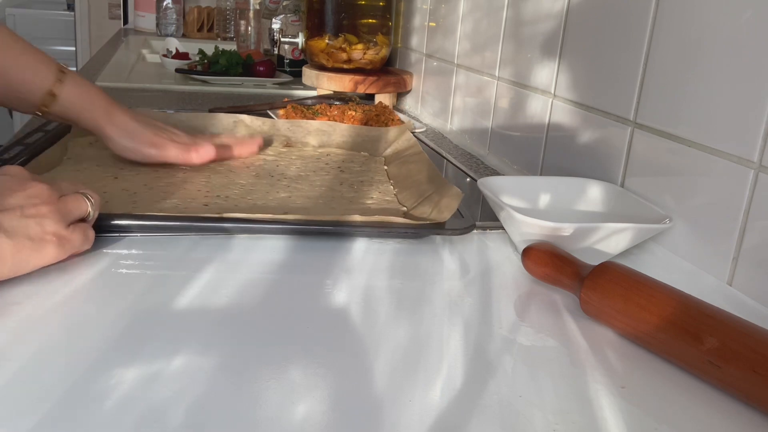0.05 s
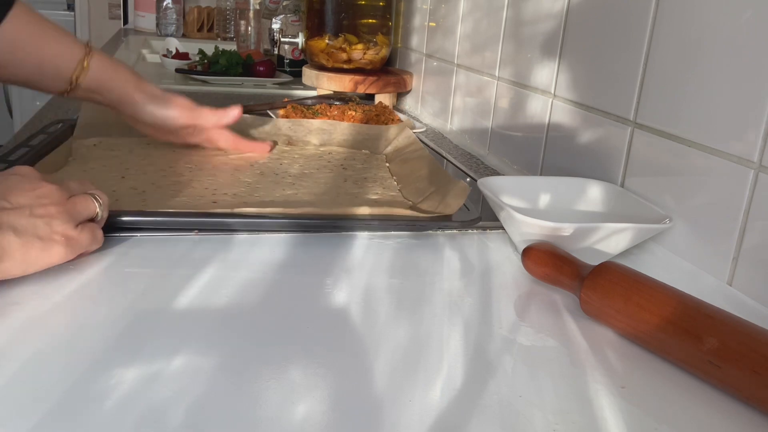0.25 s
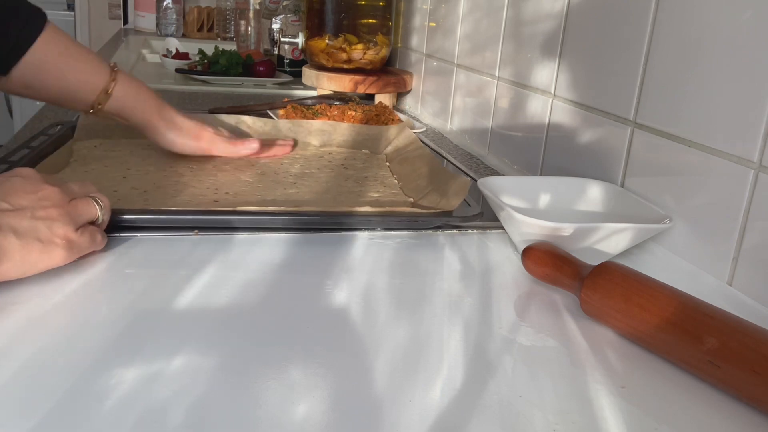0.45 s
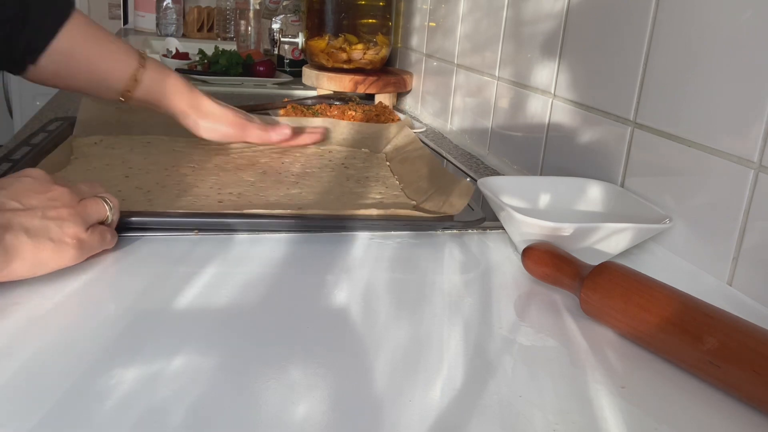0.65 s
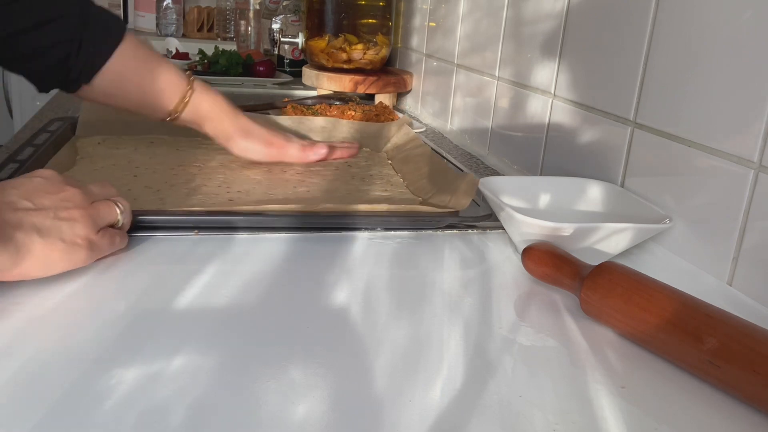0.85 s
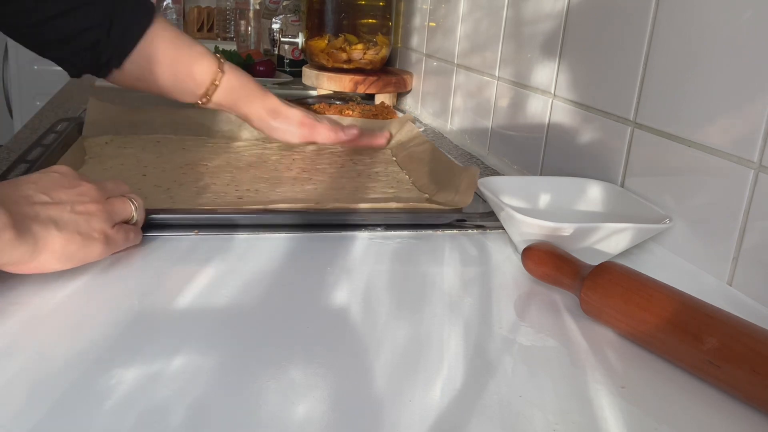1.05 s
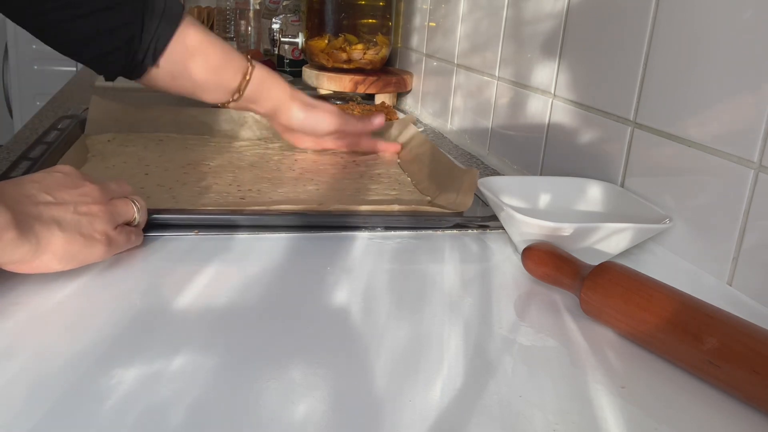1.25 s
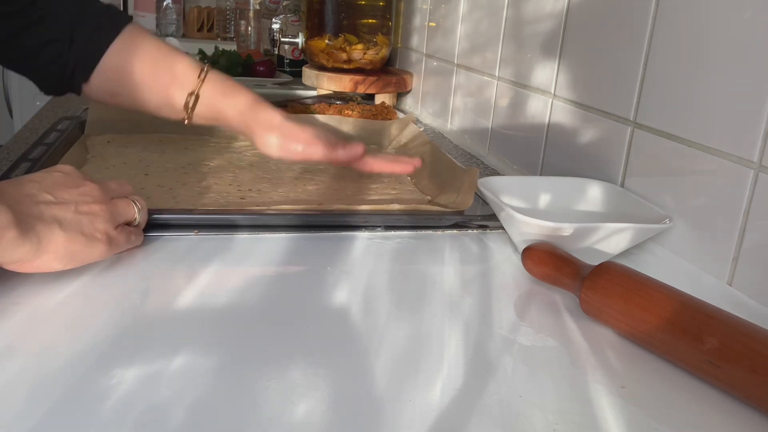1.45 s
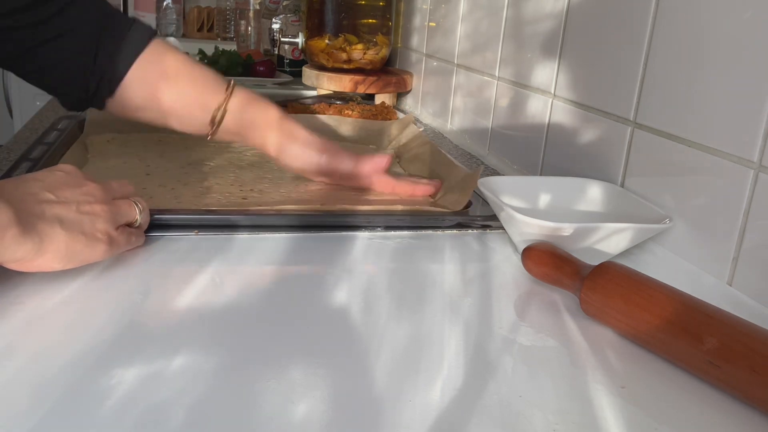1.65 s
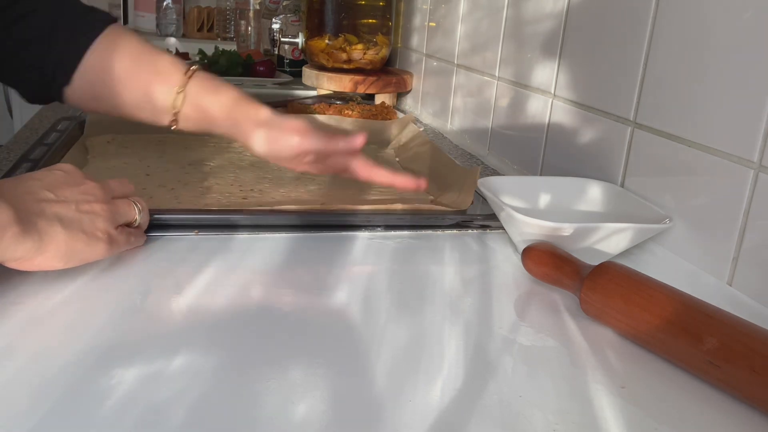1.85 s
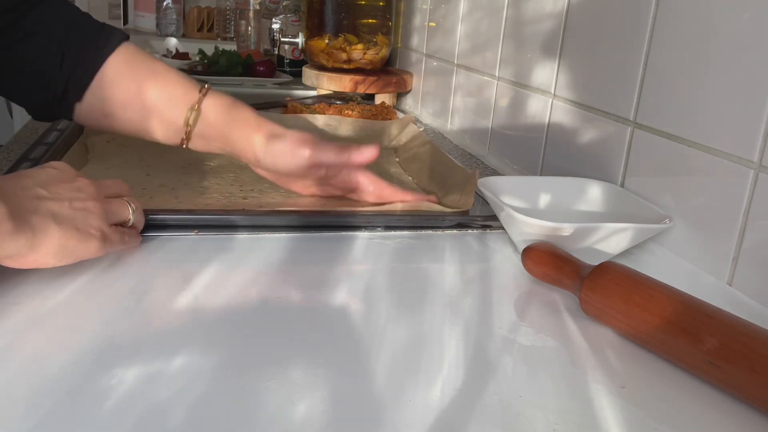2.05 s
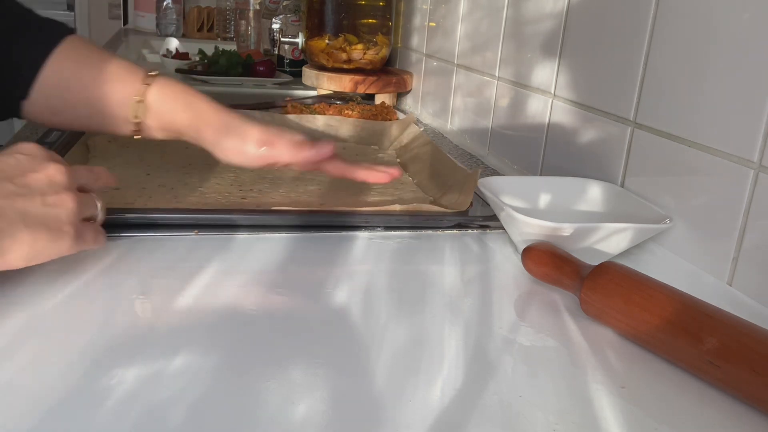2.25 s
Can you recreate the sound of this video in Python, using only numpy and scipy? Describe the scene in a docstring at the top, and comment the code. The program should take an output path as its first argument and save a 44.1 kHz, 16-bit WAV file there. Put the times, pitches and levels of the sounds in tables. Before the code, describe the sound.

Irregular soft slaps on a paper-lined baking tray, each with a short dull metallic boom and low counter thump; paper rustles between them, faint room air, close stereo pickup, short kitchen echo.

```python
"""A hand pats a thin sheet of dough lying on baking paper in a metal tray, on a counter in a tiled kitchen.
Each pat is a band of noise for the slap, ringing modes for the boom of the tray and the thump of the counter.
The paper crackles in bursts of tiny noise snaps; between pats the rocking tray and counter hum faintly.
Feedback delays give the kitchen's echo, over a steady bed of coloured noise for the air."""
import sys
import numpy as np
from scipy import signal
from scipy.fft import rfft, irfft, next_fast_len
from scipy.io import wavfile

SR = 44100
rng = np.random.default_rng(int(sys.argv[2]) if len(sys.argv) > 2 else 0)


def persist_wave(psi):
    """Save psi, clipped to +-1, as 16-bit WAV."""
    counts = np.round(np.clip(psi, -1, 1) * 32767).astype(np.int16)
    wavfile.write(sys.argv[1], SR, np.atleast_2d(counts).T)


def convert_level_to_amplitude(level_db):
    """Map a level in decibels to its linear amplitude factor."""
    exponent = np.asarray(level_db, float) / 20
    return 10 ** exponent


N = 101429   # length in samples


def rms_one(x):
    """Scale to rms 1."""
    return x / np.sqrt(np.mean(x ** 2) + 1e-20)


def in_time(rows):
    """Join (seconds, value) rows by straight lines."""
    return np.interp(np.arange(N) / SR, *np.transpose(rows))


def colour(x, spectrum):
    """Shape by a (Hz, dB) table with a minimum-phase filter of unit energy, so nothing sounds early."""
    size = next_fast_len(N + SR // 2)
    hz, db = np.transpose(spectrum)
    grid_hz = np.arange(1025) * SR / 2048
    curve_db = np.interp(np.log(grid_hz + 1), np.log(hz), db)
    # folding the cepstrum forward in time makes the filter minimum phase
    cepstrum = irfft(np.log(convert_level_to_amplitude(curve_db)))
    cepstrum[1:1024] *= 2
    cepstrum[1025:] = 0
    pulse = irfft(np.exp(rfft(cepstrum)))
    pulse /= np.sqrt(np.sum(pulse ** 2))
    return irfft(rfft(x, size) * rfft(pulse, size), size)[..., :N]


def soften(x, cut_hz):
    """Two-pole low-pass."""
    return signal.sosfilt(signal.butter(2, cut_hz, fs=SR, output="sos"), x)


def ring(push, hz, t60):
    """A resonator: a unit click sets a sine of height 1 ringing, down 60 dB after t60 seconds."""
    radius = convert_level_to_amplitude(-60 / (t60 * SR))
    angle = 2 * np.pi * hz / SR
    return signal.lfilter([0, np.sin(angle)], [1, -2 * radius * np.cos(angle), radius ** 2], push + 1e-18)


def swell(rise, fall, late=0):
    """Envelope: rounded rise, then exponential fall, all in seconds."""
    t = np.arange(SR // 5) / SR - late
    return np.clip(t / rise, 0, 1) ** 2 * np.exp(-np.clip(t - rise, 0, 1) / fall)


def lay(start, rows):
    """Place the rows at their start times."""
    out = np.zeros(N + SR)
    for s, row in zip(start, rows):
        i = max(int(s * SR), 0)
        out[i:i + len(row)] += row
    return out[:N]


# Spectrum of the room air. Each row: frequency in Hz, relative level in dB per Hz.
AIR_SPECTRUM = [(30, -16), (130, -6.5), (470, -30), (4000, -31), (16000, -48)]
AIR_DB = -58


def room_air():
    """Steady noise, drawn separately for each side."""
    return convert_level_to_amplitude(AIR_DB) * colour(rng.standard_normal((2, N)), AIR_SPECTRUM)


# Low modes of the tray. Each row: frequency in Hz, relative level in dB, t60 in seconds.
TRAY_MODES = [(222, -2, 0.05), (263, 5, 0.085), (297, 1, 0.06), (335, 2, 0.085), (501, -6, 0.07)]
# Modes of the counter. Each row: frequency in Hz, relative level in dB, t60 in seconds.
COUNTER_MODES = [(47.3, -36, 0.07), (60.9, -11, 0.43), (113.7, -5, 0.11), (138, 0.5, 0.12)]
# How hard the tray rocks under the hand. Each row: time in seconds, level in dB of the counter's hum.
ROCKING = [(0, -47), (1.2, -50), (1.4, -72), (1.6, -52.5), (2.3, -74)]
ROCK_TRAY_DB = -4   # tray against counter


def hum(push, modes):
    """Every mode rings on under the same continuous push."""
    return rms_one(sum(convert_level_to_amplitude(db) * ring(push, hz, t60) for hz, db, t60 in modes))


def rocking():
    """Small uneven pushes keep counter and tray humming."""
    push = rng.standard_normal(N)
    both = hum(push, COUNTER_MODES) + convert_level_to_amplitude(ROCK_TRAY_DB) * hum(push, TRAY_MODES)
    return convert_level_to_amplitude(in_time(ROCKING)) * both


# Paper crackles. Each row: start in seconds, level in dB before PAPER_DB, length in seconds.
CRACKLES = [(.004, -29, 0.039), (0.034, -34, 0.1), (0.184, -17, 0.02), (0.275, -24, 0.011),
            (0.302, -23, 0.013), (0.336, -26, 0.021), (0.359, -26.5, 0.015), (0.376, -22, .012),
            (0.424, -25, 0.0081), (0.452, -27.5, 0.028), (0.493, -18.5, 0.011), (0.57, -25, 0.0022),
            (0.64, -28.5, 0.049), (0.715, -18, 0.006), (0.726, -14.5, 0.0052), (0.804, -32, 0.027),
            (0.859, -32, 0.023), (0.88, -21.5, 0.022), (0.914, -24.5, 0.018), (0.98, -22.5, 0.027),
            (1.051, -20.5, 0.0097), (1.073, -19.5, 0.01), (1.098, -19.5, 0.011), (1.151, -17, 0.012),
            (1.157, -22, 0.07), (1.233, -25.5, 0.0039), (1.247, -19, 0.011), (1.257, -30, 0.0028),
            (1.422, -41.5, 0.022), (1.436, -23.5, 0.041), (1.502, -21.5, 0.0071), (1.515, -20.5, 0.027),
            (1.541, -24, 0.014), (1.568, -30.5, 0.023), (1.6, -22, 0.019), (1.61, -21, 0.0067),
            (1.661, -22, 0.011), (1.801, -27, 0.019), (1.827, -31, 0.036), (1.93, -20, 0.018),
            (2.007, -27, 0.016), (2.029, -18, 0.0096), (2.28, -43, 0.018)]
# Spectrum of the paper. Each row: frequency in Hz, relative level in dB per Hz.
PAPER_SPECTRUM = [(400, -16), (1000, -3.5), (2500, -4.5), (4000, 0.5), (8000, 2), (16000, -1.5)]
PAPER_DB = -9
SNAPS_PER_S, SNAP_SPREAD_DB = 9000, 3.0
CLUMP_DB, CLUMP_HZ = 4, 87   # the snaps come in clumps
RISE_S, RISE_SHARE, FALL_SHARE = 0.006, 0.3, 0.8   # shares of the crackle's length
FAR_EDGE_HZ = 5740   # duller crackle from the other side of the sheet


def paper():
    """Dense tiny snaps of uneven size, in bursts, from two parts of the sheet."""
    s, db, length = np.transpose(CRACKLES)
    length = np.abs(length)[:, None]
    sizes = convert_level_to_amplitude(SNAP_SPREAD_DB * np.minimum(rng.exponential(1, (2, N)), 4))
    sizes = sizes * rng.choice([-1, 1], (2, N))
    clumps = convert_level_to_amplitude(CLUMP_DB * rms_one(soften(rng.standard_normal((2, N)), CLUMP_HZ)))
    fires = rng.random((2, N)) < SNAPS_PER_S / SR
    snaps = rms_one(clumps * sizes * fires)
    bursts = swell(RISE_S + RISE_SHARE * length, FALL_SHARE * length) * convert_level_to_amplitude(db + PAPER_DB)[:, None]
    # starting early puts the start time inside the rise
    loudness = lay(s - RISE_S / 2, bursts)
    near, far = colour(loudness * snaps, PAPER_SPECTRUM)
    return near, soften(soften(far, FAR_EDGE_HZ), FAR_EDGE_HZ)


MODE_SPREAD_DB, MODE_SHIFT = 4.0, .02   # limits either way; the hand's load shifts each mode by a share


def struck(start, force, peak_db, modes):
    """Each blow drives every mode, with a strength and slight shift of its own, scaled to the blow's peak."""
    chance = np.clip(rng.standard_normal((len(start), 2, len(modes))), -1, 1)
    force = np.pad(force, ((0, 0), (0, SR // 3)))   # room to ring on
    rows = []
    for push, (spread, shift) in zip(force, chance):
        row = 0
        for k, (hz, db, t60) in enumerate(modes):
            row = row + convert_level_to_amplitude(db + MODE_SPREAD_DB * spread[k]) * ring(push, hz * (1 + MODE_SHIFT * shift[k]), t60)
        rows.append(row)
    rows = np.array(rows)
    gain = convert_level_to_amplitude(peak_db) / np.abs(rows).max(axis=1)
    return lay(start, rows * gain[:, None])


# The pats. Each row: start in seconds, peak of the tray boom in dB, counter thump in dB relative to the boom
# before COUNTER_DB, slap in dB relative to the boom before SLAP_DB and RING_DB, pitch of the slap in Hz.
PATS = [(0.188, -26.5, 5.5, -2.5, 1640), (0.28, -33.5, 9, 0.5, 1780), (0.3261, -27, -3, -3.5, 1130),
        (0.3376, -24.5, -8, 1.5, 1480), (0.488, -28, 9, -3.5, 1390), (0.606, -44.5, 18, -3, 1500),
        (0.7266, -17.5, -1.5, 0, 2700), (0.817, -24, -27, -12, 900), (0.912, -36.5, -5, 1, 1430),
        (0.986, -30, -20, 10, 2200), (0.997, -8, -11, -10, 2200), (1.025, -14, -13, -4, 2690),
        (1.135, -28, -16, -15, 1500), (1.449, -12, -10, -3.5, 1700), (1.506, -26, -5.5, -30, 1410),
        (1.681, -37.5, -4, -7.5, 1160), (1.847, -14.5, -20.5, -7.5, 1920), (2.023, -32, -2.5, 3.5, 2520)]
# High modes of the tray, woken by the slap. Each row: frequency in Hz, relative level in dB, t60 in seconds.
TRAY_HIGH_MODES = [(795, -4, .05), (1308, 2, 0.055), (1443, 2, 0.045), (1804, 2, 0.045), (2057, 3, .08),
                   (2266, 4, 0.055), (2985, 2, .055)]
# Spectrum laid over the slap. Each row: frequency in Hz, relative level in dB per Hz.
SLAP_SPECTRUM = [(290, -16), (650, -4.5), (1500, -0.5), (4500, 0.5), (9000, -20), (16000, -30)]
PALM_HZ, FINGER_HZ, HEEL_HZ = 610, 5400, 114   # low-pass softness of each part of the hand
SLAP_DB, RING_DB, COUNTER_DB = 2.5, -1.5, -1.5
SLAP_WIDTH = 1.97   # the slap's band reaches this factor to either side of its pitch
SLAP_FALL_S = 0.0048
SLAP_TAIL_S, SLAP_TAIL_DB, SLAP_TAIL_HZ = 0.021, -15.5, 2200


def pats():
    """Fingers slap at a pitch set by the cupped hand; the palm then knocks the tray, the heel loads the counter."""
    s, db, low_db, slap_db, slap_hz = np.transpose(PATS)
    noise = rng.standard_normal((3, len(s), SR // 5))

    palm = soften(noise[0] * swell(rise=0.0027, fall=0.0056, late=.0022), PALM_HZ)
    boom = struck(s, palm, db, TRAY_MODES)

    heel = soften(noise[0] * swell(rise=0.011, fall=0.0092), HEEL_HZ)
    thump = struck(s, heel, db + low_db + COUNTER_DB, COUNTER_MODES)

    spikes = convert_level_to_amplitude(3.5 * rng.exponential(1, noise[1].shape).clip(0, 3))
    spiky = noise[1] * spikes * swell(rise=0.0011, fall=SLAP_FALL_S)
    cupped = []
    for hz, row in zip(slap_hz, spiky):
        band = signal.butter(1, [hz / SLAP_WIDTH, hz * SLAP_WIDTH], "band", fs=SR, output="sos")
        cupped.append(signal.sosfilt(band, row))
    cupped = np.array(cupped)
    cupped = cupped / np.abs(cupped).max(axis=1)[:, None]
    high = struck(s, cupped, db + slap_db + RING_DB, TRAY_HIGH_MODES)

    tail = rms_one(soften(noise[2], SLAP_TAIL_HZ)) * swell(rise=0.0057, fall=SLAP_TAIL_S)
    slaps = (cupped + convert_level_to_amplitude(SLAP_TAIL_DB) * tail) * convert_level_to_amplitude(db + slap_db + SLAP_DB)[:, None]
    slap = colour(lay(s, slaps), SLAP_SPECTRUM)
    return boom, thump, soften(high, FINGER_HZ) + slap


KITCHEN_T60_S, WALL_CUT_HZ = 0.39, 7300   # t60 at the lowest frequencies; the treble dies sooner


def kitchen(x):
    """Eight feedback delays a side, duller on every round, as sound bounces between the walls."""
    size = next_fast_len(N + SR)
    turn = np.exp(-2j * np.pi * np.arange(size // 2 + 1) / size)   # one sample of delay
    dull = np.exp(-2 * np.pi * WALL_CUT_HZ / SR)
    wall = np.sqrt((1 - dull) / (1 - dull * turn))
    out = np.zeros((2, len(turn)), complex)
    for k, lag in enumerate((rng.uniform(.004, .03, 16) * SR).astype(int)):
        loop = convert_level_to_amplitude(-60 * lag / SR / KITCHEN_T60_S) * wall * turn ** lag
        out[k % 2] += loop / (1 - loop) * (-1) ** (k // 2)
    return irfft(out * rfft(x, size), size)[:, :N]


def place(x, pan_db, left_lag_s=0):
    """Pan by left minus right in dB, and let the left side hear it a little later."""
    size = next_fast_len(N + 64)
    delay = np.exp(-2j * np.pi * np.arange(size // 2 + 1) / size * left_lag_s * SR)
    late = irfft(rfft(x, size) * delay, size)[:N]
    return np.array([late * convert_level_to_amplitude(pan_db / 2), x * convert_level_to_amplitude(-pan_db / 2)])


TRAY_PAN_DB, SLAP_PAN_DB, PAPER_PAN_DB, LOW_PAN_DB = -4.5, 2, -0.1, -2.5   # left minus right
PAPER_LEFT_LAG_S, SLAP_LEFT_LAG_S = 0.000268, 0.000088
ROOM_DB, PAPER_ROOM_DB = -20, -16   # sends to the kitchen


def scene():
    """Pats, paper, rocking tray, kitchen echo and room air."""
    boom, thump, slap = pats()
    sheet, edge = paper()
    air = room_air()
    near = place(boom, TRAY_PAN_DB)
    near = near + place(thump + rocking(), LOW_PAN_DB)
    near = near + place(slap, SLAP_PAN_DB, SLAP_LEFT_LAG_S)
    near = near + place(sheet, PAPER_PAN_DB, PAPER_LEFT_LAG_S)
    near = near + place(edge, PAPER_PAN_DB)
    echo = kitchen(convert_level_to_amplitude(ROOM_DB) * (slap + boom) + convert_level_to_amplitude(PAPER_ROOM_DB) * (sheet + edge))
    return near + echo + air


def top_cut(x):
    """Nothing passes above the cut-off."""
    return signal.sosfilt(signal.butter(12, 16990, fs=SR, output="sos"), x)


def record(dry):
    """The microphone loses the deepest bass, and a steep low-pass cuts the top."""
    mic_low_hz, cutoff_hz = 46, 16600
    thin = signal.sosfilt(signal.butter(4, mic_low_hz, "high", fs=SR, output="sos"), dry)
    cut = signal.sosfilt(signal.cheby2(10, 60, cutoff_hz, fs=SR, output="sos"), thin)
    return top_cut(cut)


dry = scene()
out = record(dry)
persist_wave(out)
```